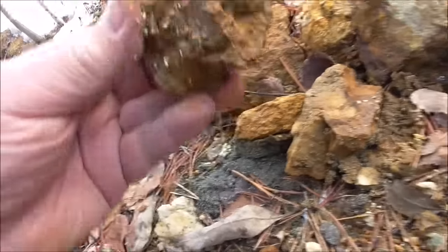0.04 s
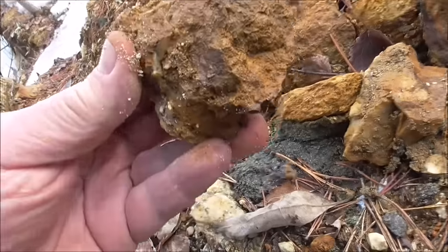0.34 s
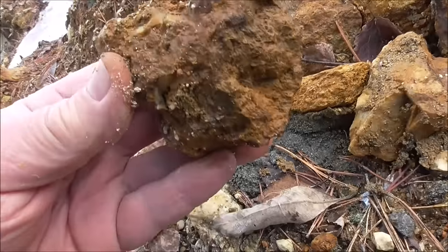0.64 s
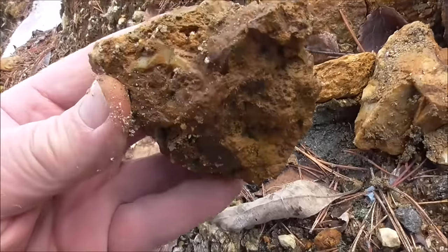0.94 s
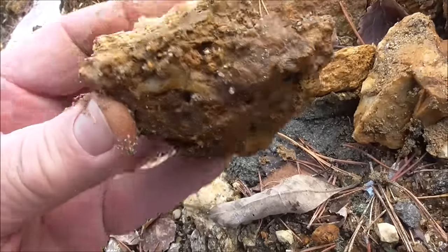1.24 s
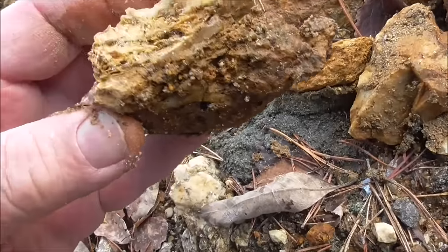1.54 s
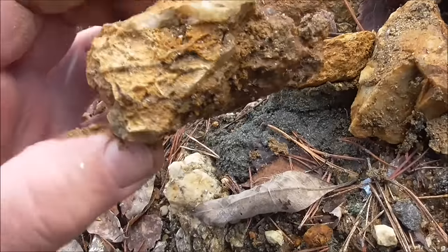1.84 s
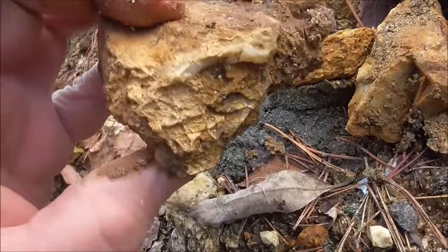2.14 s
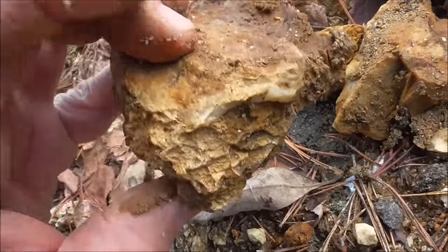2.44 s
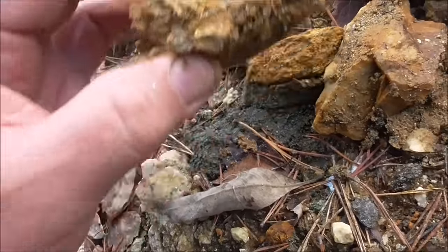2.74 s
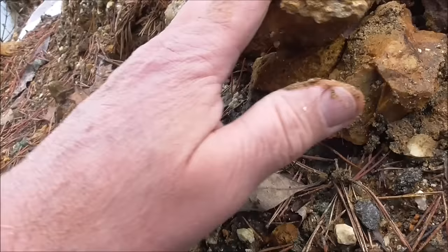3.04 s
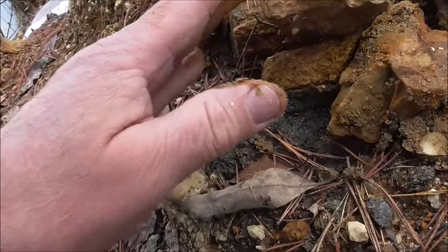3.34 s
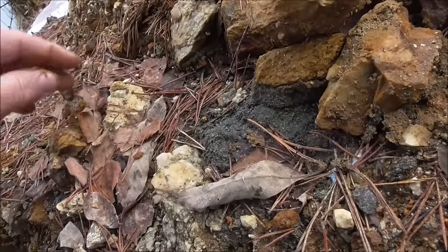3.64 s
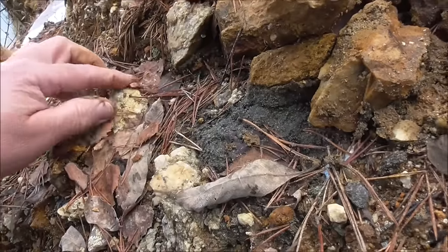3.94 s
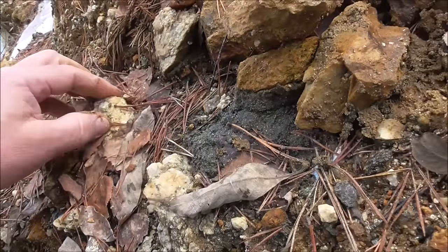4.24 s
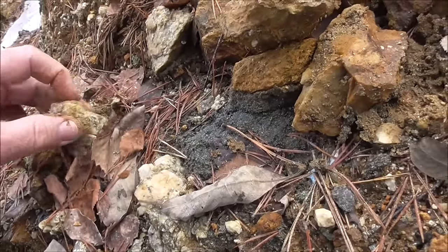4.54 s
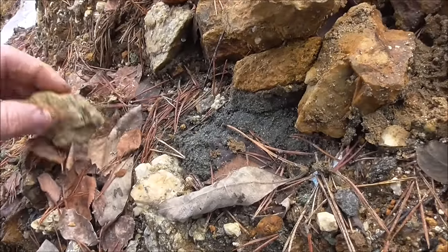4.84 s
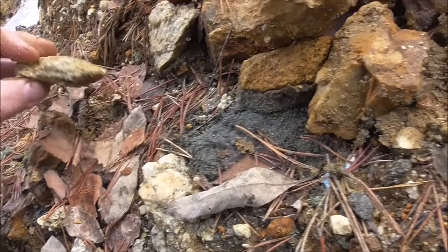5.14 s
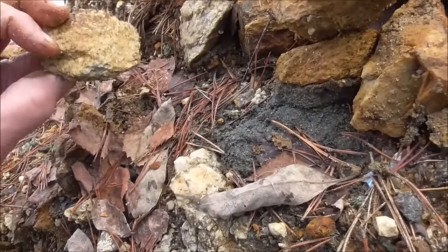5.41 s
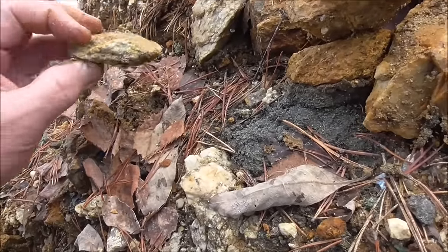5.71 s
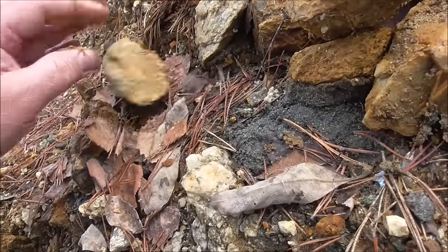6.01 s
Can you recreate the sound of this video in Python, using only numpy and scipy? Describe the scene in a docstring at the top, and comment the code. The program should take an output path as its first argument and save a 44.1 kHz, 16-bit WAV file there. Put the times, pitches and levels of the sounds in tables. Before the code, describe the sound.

Close to the microphone, a hand turns a crumbly lump of rock, with soft scraping and sharp ticks of grit bouncing on stones. The lump is set down with a thud and a loud clack, followed by smaller knocks and a brief sleeve swish. Fingers then work a stone out of dry leaves and pine needles, which crackle and snap. Light rubbing and ticks follow, over faint, still outdoor air.

```python
"""Outdoors by a rocky bank, in faint, still air, a hand turns a crumbly lump of rock close by.
Skin scrapes over the stone, and grit drops off and bounces on the stones below.
The lump is set down among other rocks with a thud and a clack, and a sleeve sweeps past.
Then the fingers work a flat stone out of dry leaves and pine needles, which crackle, bend and snap."""
import sys
import numpy as np
from scipy import signal
from scipy.fft import rfft, irfft, next_fast_len
from scipy.io import wavfile

SR = 44100
rng = np.random.default_rng(int(sys.argv[2]) if len(sys.argv) > 2 else 0)


def file_out(sig):
    """Save sig as 16-bit WAV at sys.argv[1]."""
    # one column per channel
    cols = np.atleast_2d(sig).T
    # limit, then scale
    lim = np.clip(cols, -1, 1)
    pcm = np.round(lim * 32767).astype(np.int16)
    wavfile.write(sys.argv[1], SR, pcm)


N = 267819
T = np.arange(N) / SR
HIT = 4096  # samples allowed for one blow to die away

# the dull tone of rubbing, on rock or in folds of cloth: f/Hz, level/dB
RUB_TONE = [(35, -30), (60, -18.5), (193, -1), (290, -3), (478, -2.5), (525, -9.5), (586, -5), (1280, -10),
            (1770, -17), (2500, -22.5), (3250, -52), (5500, -120)]


def undb(db):
    """Turn decibels into a factor to multiply by."""
    return 10 ** (np.asarray(db) / 20)


def unit(x):
    """Scale a sound so that its average level (rms) is 1."""
    return x / np.sqrt(np.mean(x ** 2))


def peak(x):
    """Scale a sound so that its highest peak is 1."""
    return x / np.abs(x).max()


def colour(x, points):
    """Shape a sound's tone along a curve of points: f/Hz, level/dB."""
    hz, db = np.transpose(points)
    size = next_fast_len(N + HIT, True) // 2 * 2
    f = np.maximum(np.fft.rfftfreq(size, 1 / SR), 1)
    gain = undb(np.interp(np.log(f), np.log(np.maximum(hz, 1)), db))
    # folding the cepstrum makes the filter ring only after a click, never before it
    cepstrum = irfft(np.log(gain))
    cepstrum[1:size // 2] *= 2
    cepstrum[size // 2 + 1:] = 0
    return irfft(rfft(x, size) * np.exp(rfft(cepstrum)))[..., :x.shape[-1]]


def ring(x, modes):
    """Make a sound ring at each mode (f/Hz, width/Hz, level/dB); wider modes die away sooner."""
    out = 0
    for hz, width, db in modes:
        band = np.concatenate(signal.iirpeak(hz, hz / width, fs=SR))
        out = out + undb(db) * signal.sosfilt([band, band], x)
    return out


def low_cut(x, hz):
    """Take out the deep bass below hz, so thumps sound tight rather than boomy."""
    return signal.sosfilt(signal.butter(4, hz, "high", fs=SR, output="sos"), x)


def place(x, pan_db, lag_us):
    """Make the left side pan_db louder and the right side lag_us microseconds later."""
    size = x.shape[-1]
    delay = np.exp(-2j * np.pi * np.outer([0, lag_us / 1e6], np.fft.rfftfreq(size, 1 / SR)))
    return irfft(rfft(x) * delay, size) * undb([[pan_db / 2], [-pan_db / 2]])


def add(out, s, x):
    """Mix a short stereo sound in at s seconds."""
    i = int(np.clip(s * SR, 0, N - 1))
    out[:, i:i + x.shape[1]] += x[:, :N - i]


def wander(rate):
    """A curve that heads for a new random value, about 1 in size, rate times a second."""
    knots = rng.standard_normal(N // 20)
    return np.interp(T * rate, np.arange(len(knots)), knots)


def grains(rate, spread_db, apart, lag_us):
    """Tiny random breaks, rate per second; apart sets how much left and right differ."""
    size = next_fast_len(N, True)
    when, big, sign, lean = rng.random((int(rate * N / SR), 4)).T
    strength = undb(spread_db * np.minimum(-np.log(1 - big), 4))
    push = strength * np.sign(sign - .5)
    at = (when * N).astype(int)
    middle = place(np.bincount(at, push, size), 0, lag_us)
    side = apart * np.sqrt(12) * np.bincount(at, push * (lean - .5), size)
    return (middle + np.array([side, -side]))[:, :N]


def fracture(tail_s, tail_db, apart):
    """One sharp break and the crumbling after it, which differs between left and right."""
    crumble = rng.standard_normal(HIT) + apart * rng.standard_normal((2, HIT))
    push = undb(tail_db) * crumble * np.exp(-np.arange(HIT) / SR / tail_s)
    push[:, 0] += 1
    return push


def gesture(start_s, length_s, attack_s, release_s):
    """The strength of a hand or arm movement: it gathers speed, holds and dies away."""
    age = T - start_s
    return np.clip(age / attack_s, 0, 1) * np.exp(-np.maximum(age - length_s, 0) / release_s)


def chance_events(activity, count):
    """Events that crowd where activity is high: t/s, activity then, three random numbers."""
    draws = rng.standard_normal((count, 4))
    share = (np.arange(count) + .5 + .5 * np.tanh(draws[:, 0])) / count
    at = np.minimum(np.searchsorted(np.cumsum(activity) / activity.sum(), share), N - 1)
    return np.column_stack([T[at], activity[at], draws[:, 1:]])


def air(level_db=-59.5, apart=0.86):
    """A faint, wide outdoor hush that wavers a little."""
    # the tone of still air: f/Hz, level/dB
    air_tone = [(25, -22.5), (75, -11), (125, -8.5), (175, -3.5), (290, -0.5), (430, -5), (650, -6.5),
                (950, -8), (1350, -10), (1800, -18), (2200, -17), (2750, -23), (4200, -18), (6000, -22),
                (8300, -16), (11500, -17.5), (15500, -25.5)]
    middle, side = rng.standard_normal((2, N))
    hush = colour(np.array([middle + apart * side, middle - apart * side]), air_tone)
    return undb(level_db + .5 * wander(rate=2.85)) * unit(hush)


def stroke_gains():
    """How strong the dull scrape and the sandy scratch are at each moment."""
    # strokes of skin over gritty rock: t/s, length/s, swell/s, scrape/dB, scratch/dB
    strokes = [(-.02, .12, 0.016, -47.5, -50.5), (0.116, 0.13, .02, -52, -55.5),
               (0.266, .19, 0.017, -61, -59.5), (0.454, 0.26, 0.02, -59.5, -63.5),
               (0.827, .21, 0.11, -66.5, -61.5), (1.216, .61, .05, -71, -68.5),
               (1.704, .35, 0.11, -64.5, -58), (2.064, 0.61, 0.018, -66.5, -63.5),
               (2.622, 0.19, 0.025, -63.5, -61.5), (2.797, .17, .08, -54, -54.5),
               (3.07, .07, 0.036, -53, -54.5), (3.194, 0.35, 0.015, -60.5, -61),
               (3.657, .17, .02, -81.5, -60), (4.12, 0.12, 0.024, -60.5, -60),
               (4.517, .45, 0.016, -60, -65.5), (5.027, 0.2, .05, -70, -63),
               (5.213, .19, 0.036, -69, -65.5), (5.992, 0.014, .015, -62.5, -56)]
    power = 0
    for s, length, swell_s, scrape_db, scratch_db in strokes:
        movement = gesture(s, length, swell_s, release_s=0.038)
        power = power + (undb([[scrape_db], [scratch_db]]) * movement) ** 2
    return np.sqrt(power)


def rubbing():
    """Skin and stone stick and slip: rock scrapes, sand scratches, and slips crunch coarser grit."""
    # the bright tone of sand on rock: f/Hz, level/dB
    sand_tone = [(1060, -41), (1800, -11.5), (2120, -6), (2690, -7.5), (3570, -3.5), (4970, -2.5),
                 (6130, -3.5), (7770, 2), (11200, 0), (15000, -11), (16000, -32)]
    # short slips of stone over gritty ground: t/s, length/s, shudder/dB, shudder f/Hz, crunch/dB
    slips = [(0.002, 0.1, -48, 430, -60), (0.131, 0.044, -53.5, 590, -66),
             (0.179, 0.043, -42.5, 407, -48.5), (0.243, 0.014, -54.5, 950, -68),
             (0.375, 0.023, -62, 190, -47.5), (1.963, 0.04, -60, 890, -56), (3.023, 0.016, -39.5, 250, -47),
             (3.036, 0.045, -49.5, 222, -56.5), (3.224, 0.043, -50.5, 210, -47),
             (3.365, 0.056, -51, 231, -49), (4.892, 0.02, -50, 480, -46), (4.907, 0.039, -54.5, 1180, -60),
             (4.933, 0.082, -65, 400, -62), (5.009, 0.025, -63, 250, -57)]
    scrape = grains(rate=1500, spread_db=1, apart=0.36, lag_us=5.5) * undb(2 * wander(rate=50))
    scratch = grains(rate=3500, spread_db=-1, apart=0.34, lag_us=21) * undb(1.85 * wander(rate=110))
    scrape_gain, scratch_gain = stroke_gains()
    out = unit(colour(scrape, RUB_TONE)) * scrape_gain + unit(colour(scratch, sand_tone)) * scratch_gain
    crunch = colour(grains(rate=2400, spread_db=3, apart=0.27, lag_us=15), sand_tone)
    for s, length, shudder_db, hz, crunch_db in slips:
        span = (T > s) & (T < s + length)
        fade = signal.windows.tukey(span.sum(), .3)
        push = np.pad(scrape[:, span] * fade, [(0, 0), (0, HIT)])
        shudder = low_cut(ring(push, [(hz, hz * 1.21, 0)]), hz=103)
        add(out, s, undb(shudder_db) * shudder / shudder[:, :len(fade)].std())
        add(out, s, undb(crunch_db) * unit(crunch[:, span]) * fade)
    return out


def thud(hz):
    """Soil or a palm takes a blow with a dead thump."""
    # the thump's modes: f/multiple of hz, width/multiple of hz, level/dB
    ground_modes = [(.8, 0.99, 0.5), (1.75, 0.71, -12.5)]
    modes = [(hz * ratio, hz * width, db) for ratio, width, db in ground_modes]
    blow = fracture(tail_s=0.0061, tail_db=-23, apart=0.37)
    return peak(low_cut(ring(blow, modes), hz=106))


def clack(blow_db, gentle_hz=1100, hard_db=-27.5):
    """Struck rock rings; above hard_db, a harder blow makes a shorter contact and sounds brighter."""
    # the rock's modes: f/Hz, width/Hz, level/dB
    rock_modes = [(1165, 850, 0.5), (2270, 500, -1), (2910, 550, -5), (4630, 1370, -2.5),
                  (7500, 1100, -14.5), (10200, 1200, -11.5), (12400, 1900, -4.5)]
    # notches that make the clack sound hollow: f/Hz, width/Hz
    notches = [(1770, 590), (3600, 430), (6150, 500)]
    contact = fracture(tail_s=0.0007, tail_db=-32, apart=0.9)
    # neighbouring modes swing in opposite directions
    rock = sum((-1) ** k * ring(contact, [mode]) for k, mode in enumerate(rock_modes))
    for hz, width in notches:
        rock = signal.lfilter(*signal.iirnotch(hz, hz / width, fs=SR), rock)
    cutoff_hz = gentle_hz * undb(max(blow_db - hard_db, 0))
    return peak(signal.sosfilt(signal.butter(2, cutoff_hz, fs=SR, output="sos"), rock))


def knocks():
    """Each blow thumps whatever carries the stone and makes the rock ring."""
    # stone hitting stone, soil or palm: t/s, thud/dB, thud f/Hz, clack/dB, left minus right/dB
    blows = [(0.0181, -28, 420, -68, 0), (0.417, -62, 300, -49.5, -1), (0.724, -51, 400, -45, 1),
             (1.789, -35.5, 225, -37, -2), (2.119, -40.5, 385, -53, 2), (2.309, -40.5, 350, -55, 2),
             (2.572, -50, 218, -49, 0), (2.639, -42, 427, -63, 0), (2.758, -43, 224, -53, -2),
             (2.958, -39.5, 362, -39.5, 5), (3.0052, -19.5, 172, -26.5, -2), (3.0222, -24.5, 270, -9, -3),
             (3.039, -36, 220, -36, -3), (3.121, -41.5, 382, -67, -4), (3.178, -41.5, 350, -65, -4),
             (3.218, -30.5, 342, -39, -3), (3.236, -35.5, 240, -39, -3), (3.243, -60, 370, -38.5, -1),
             (3.256, -37.5, 265, -56, -8), (3.273, -39.5, 300, -48, -2), (3.375, -36, 247, -59, -4),
             (3.4, -36, 284, -60, -3), (3.407, -34.5, 372, -31, -3.5), (3.822, -52, 397, -40, 4),
             (4.017, -48, 438, -30, 1), (4.201, -35, 614, -56, -1), (4.8949, -35, 730, -36, 3),
             (5, -39.5, 397, -60, 1), (5.093, -56, 500, -46.5, 2), (5.56, -52.5, 350, -68, 0),
             (5.856, -43, 370, -68, 2)]
    out = np.zeros((2, N))
    for s, thud_db, thud_hz, clack_db, pan_db in blows:
        knock = undb(thud_db) * thud(thud_hz) + undb(clack_db) * clack(clack_db)
        add(out, s, place(knock, pan_db, lag_us=11))
    return out


def bank_echo(x, db, decay_s):
    """Add the short, blurred echo that the rocky bank throws back."""
    t = np.arange(HIT) / SR
    echo = rng.standard_normal((2, HIT)) * np.exp(-t / decay_s) * (t > .002)
    return x + undb(db) * signal.fftconvolve(x, unit(echo) / np.sqrt(HIT), axes=1)[:, :N]


def tick(hz, width_hz=980, ring_db=9):
    """A crumb strikes rock and rings for a millisecond or two, with a pitch of its own."""
    # the modes that all crumbs share: f/Hz, width/Hz, level/dB
    crumb_modes = [(1160, 1000, -7), (2540, 1000, -9.5), (3920, 410, -5), (4760, 1260, 3.5),
                   (7300, 1140, 4.5), (9330, 2200, 5.5), (11930, 1400, 1)]
    strike = fracture(tail_s=0.0015, tail_db=-25.5, apart=0.32)
    sound = ring(strike, crumb_modes + [(hz, width_hz, ring_db)])
    return place(peak(sound), pan_db=-0.5 + 0.5 * rng.standard_normal(), lag_us=12)


def grit(first_hop_s=0.0021, hop_share=0.38):
    """Crumbs land and bounce in ever shorter, weaker hops; rubbing loosens faint specks as well."""
    # crumbs landing on rock: t/s, peak/dB, ring f/Hz, loss per bounce/dB
    landings = [(0.3812, -26.5, 5000, 8), (.3892, -34, 7900, 9), (.416, -24.5, 4200, 14),
                (0.4175, -21, 8500, 28), (0.42, -24, 4700, 16), (.462, -43.5, 5070, 14),
                (.724, -28, 4360, 10), (0.7248, -33, 8600, 18), (0.7268, -26.5, 6640, 13),
                (0.7277, -24, 7360, 4), (0.74, -43, 4800, 16), (1.789, -37.5, 8000, 8),
                (2.64, -38.5, 7660, 16), (2.661, -39, 8850, 4), (2.676, -44, 7560, 8),
                (2.7474, -37, 7750, 6), (3.005, -20, 7640, 8), (3.039, -23.5, 4700, 11),
                (3.2432, -21, 10000, 27), (3.2508, -25.5, 6600, 15), (3.395, -31, 6800, 12),
                (3.4067, -30, 4500, 20), (3.4686, -28, 11400, 10), (5.112, -40, 4600, 9),
                (5.118, -36, 7150, 9), (5.142, -44, 7100, 1), (5.183, -41, 7600, 5), (5.324, -51, 4200, 9),
                (5.348, -49, 4600, 7), (5.6312, -49, 4400, 16), (6.004, -41, 7050, 5),
                (6.013, -43, 7500, 13)]
    out = np.zeros((2, N))
    for s, db, hz, loss_db in landings:
        for bounce in range(4):
            add(out, s, undb(db - bounce * loss_db) * tick(hz))
            s += first_hop_s * hop_share ** bounce
    _, scratch_gain = stroke_gains()
    for s, gain, scatter_db, _, _ in chance_events(scratch_gain, count=24):
        add(out, s, gain * undb(5.5 - scatter_db) * tick(hz=7900))
    return out


def sleeve(start_s=3.455, hiss_db=-49.5, folds_db=-55):
    """The arm sweeps past: sliding cloth hisses briefly, and its folds rumble for longer."""
    # the tone of sliding cloth: f/Hz, level/dB
    cloth_tone = [(1060, -5), (1800, -10), (2060, -11), (3990, -4), (4570, -8), (7990, -0.5), (11300, -1.5),
                  (16000, -17)]
    hiss = unit(colour(grains(rate=12000, spread_db=1.5, apart=0.7, lag_us=15), cloth_tone))
    folds = unit(colour(grains(rate=1800, spread_db=3, apart=0.42, lag_us=11), RUB_TONE))
    hiss *= gesture(start_s, length_s=0.19, attack_s=0.051, release_s=0.05)
    folds *= gesture(start_s, length_s=0.6, attack_s=0.051, release_s=0.05)
    return undb(hiss_db) * hiss + undb(folds_db) * folds


def crush_gain(settle_s=0.037):
    """How strong the crackle is: each push builds until the leaves give way, then they settle."""
    # fingers pushing into dry leaves: giving way at t/s, build-up/s, level/dB
    pushes = [(3.85, .03, -47), (3.93, .08, -48), (4.062, .11, -42), (4.14, .05, -46.5), (4.215, 0.07, -48),
              (4.276, .04, -45.5), (4.385, .08, -43), (4.45, 0.077, -43), (4.5, .04, -46.5),
              (4.57, .08, -42.5), (4.672, .06, -48.5), (4.72, .04, -49.5), (4.8, .06, -45.5),
              (4.864, .025, -47), (4.925, .04, -43), (4.965, .03, -50.5), (5.109, 0.057, -60)]
    power = 0
    for s, build_s, db in pushes:
        build = np.clip(1 + (T - s) / build_s, 0, 1) ** 0.55
        settle = np.exp(-np.maximum(T - s, 0) / settle_s)
        power = power + (undb(db) * build * settle) ** 2
    return np.sqrt(power)


def crackling_leaves():
    """Leaves of many sizes crackle, each in its own band, giving way both together and on their own."""
    # the tone of crushed leaves and needles: f/Hz, level/dB
    leaf_tone = [(88, -41), (150, -16), (297, 4.5), (354, -6), (566, -1.5), (774, -3.5), (1290, -2.5),
                 (1760, -7), (2600, -7.5), (3350, -6), (4900, -5), (5790, -9.5), (6770, -3), (9260, -1.5),
                 (15100, -16.5), (16000, -44)]
    together_db = 1.4 * wander(rate=220)
    crackle = 0
    for hz in np.geomspace(350, 14000, 18):
        own_db = 3.4 * wander(rate=110)
        breaks = grains(rate=1300, spread_db=3, apart=0.24 + hz / 14000, lag_us=3.3)
        leaf = ring(breaks, [(hz, hz * 0.38, 0)])
        crackle = crackle + leaf * undb(together_db + own_db)
    return unit(colour(crackle, leaf_tone)) * crush_gain()


def bending_leaves(length_s=0.04, width_hz=2500, glide=0.0516):
    """Tiny breaks in a bending leaf make a papery ring that slides up or down with the strain."""
    out = np.zeros((2, N))
    breaks = grains(rate=1000, spread_db=0, apart=0.36, lag_us=7.1)
    progress = np.linspace(0, 1, int(length_s * SR))
    for s, gain, scatter_db, pitch, bend in chance_events(crush_gain(), count=44):
        hz = 7370 * 2 ** (0.574 * np.tanh(pitch))
        own_breaks = np.roll(breaks, -int(s * SR), axis=1)[:, :2 * HIT]
        paper = ring(own_breaks, [(hz, width_hz, 0)])
        # reading the sound ever faster or slower slides its pitch
        read_at = len(progress) * (progress + glide * np.tanh(bend) * progress ** 2)
        sliding = np.array([np.interp(read_at, np.arange(2 * HIT), side) for side in paper])
        add(out, s - length_s / 2, gain * undb(scatter_db - 7) * unit(sliding) * np.sin(np.pi * progress))
    return out


def snap(hz, pan_db, crumble_db):
    """A brittle leaf cracks in a quick burst of breaking fibres and rings at its own pitch."""
    modes = [(8800, 6200, 0), (4400, 1500, -9), (hz, 1000, 2.5)]
    crack = ring(fracture(tail_s=0.0016, tail_db=crumble_db, apart=0.88), modes)
    return place(peak(crack), pan_db, lag_us=29)


def snapping_leaves():
    """Some leaves snap loudly; others break at random, more often and louder under a harder push."""
    # the loudest leaves and needles: t/s, peak/dB, ring f/Hz, left minus right/dB, crumbling/dB
    loud_snaps = [(3.8586, -29, 9000, 3, -10), (3.9305, -30.5, 9800, 4, -7), (3.98, -30, 9160, 0, -8),
                  (4, -26, 7050, 1, -10), (4.0072, -27, 9000, 0, -10), (4.0106, -20, 6930, 2, -8),
                  (4.0175, -22, 9000, 2, -19), (4.0305, -15.5, 9400, 1, -14), (4.047, -20, 8950, 0, -12),
                  (4.0541, -14.5, 7700, -1, -22), (4.058, -22, 9900, 4, -16), (4.0625, -31, 8200, 2, -14),
                  (4.067, -29, 7500, -2, -10), (4.078, -22, 7700, 8, 1), (4.0841, -21, 9300, -4, -20),
                  (4.097, -27, 8540, 0, -20), (4.1582, -22.5, 9600, 1, -8), (4.163, -29, 10000, 4, -10),
                  (4.175, -21, 9700, 0, -21), (4.2101, -29, 4760, 1, -11), (4.22, -27, 5500, 0, -16),
                  (4.2514, -36, 8300, -1, -10), (4.265, -28, 12500, 0, -8), (4.273, -24.5, 13000, -1, -16),
                  (4.3125, -32, 7000, 0, -17), (4.358, -27, 8400, 0, -10), (4.386, -29, 8400, 0, -9),
                  (4.4285, -26, 8620, -1.5, -16), (4.4545, -22.5, 6600, 3, -3), (4.472, -25, 8350, -4, -17),
                  (4.4826, -23, 6400, -2, -14), (4.492, -28, 4640, 8, -14), (4.537, -30, 9000, 0, -14),
                  (4.5519, -23, 10900, -1, -7), (4.565, -25, 7200, 2, -9), (4.6465, -35, 8670, 0, -20),
                  (4.657, -36, 10000, 0, -14), (4.6668, -29, 6540, 4, -7), (4.6745, -37, 7500, 0, -21),
                  (4.709, -31, 8100, 0, -12), (4.7717, -26, 8200, 0, -12), (4.786, -33, 8000, 0, -16),
                  (4.8005, -30, 6640, 0, -9), (4.8548, -24.5, 9710, 2, -11), (4.874, -24, 8800, 5, -8),
                  (4.891, -16.5, 8750, 0, -8), (4.894, -28, 9700, -16, -10), (4.8966, -27.5, 3380, 0, -7)]
    out = np.zeros((2, N))
    for s, db, hz, pan_db, crumble_db in loud_snaps:
        add(out, s, undb(db) * snap(hz, pan_db, crumble_db))
    for s, gain, scatter_db, pitch, side in chance_events(crush_gain(), count=56):
        crack = snap(hz=7730 * 2 ** (0.37 * pitch), pan_db=6.5 * side, crumble_db=-14)
        add(out, s, gain * undb(10 + scatter_db) * crack)
    return out


def scene():
    """Mix all the sounds; only the knocks, grit and snaps echo off the bank."""
    hits = bank_echo(knocks(), db=-19.5, decay_s=0.0066)
    clicks = bank_echo(grit() + snapping_leaves(), db=-13.5, decay_s=0.0099)
    return hits + clicks + crackling_leaves() + bending_leaves() + rubbing() + sleeve() + air()


def record(dry):
    """Cut the very top of the treble, above 16000 Hz."""
    return signal.sosfilt(signal.ellip(10, .2, 70, 16000, fs=SR, output="sos"), dry)


dry = scene()
out = record(dry)
file_out(out)
```